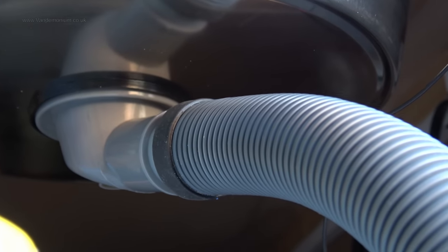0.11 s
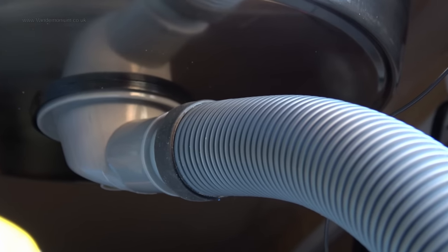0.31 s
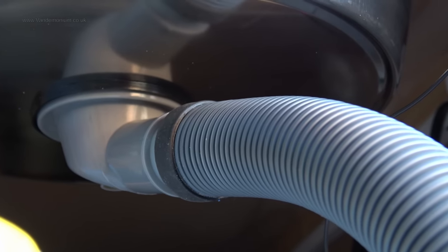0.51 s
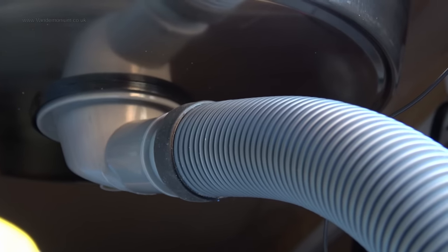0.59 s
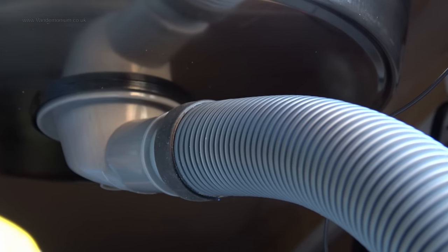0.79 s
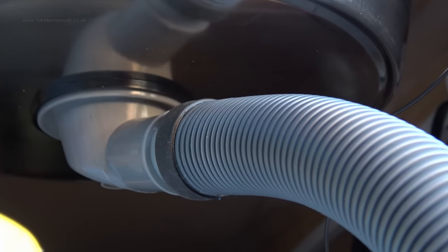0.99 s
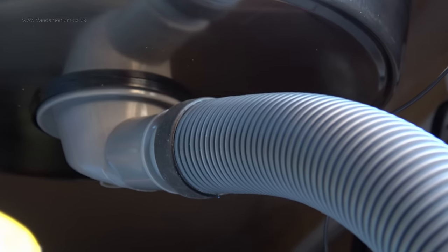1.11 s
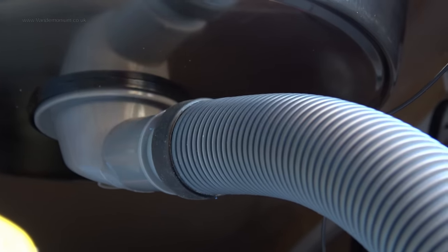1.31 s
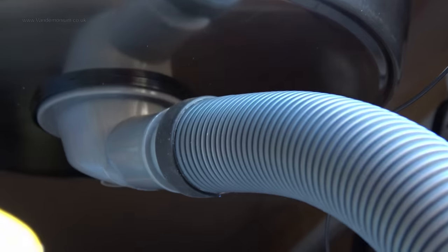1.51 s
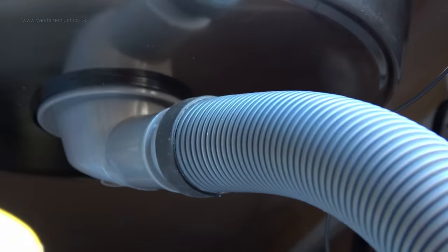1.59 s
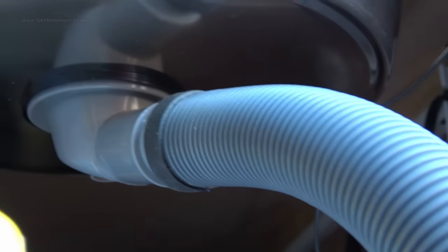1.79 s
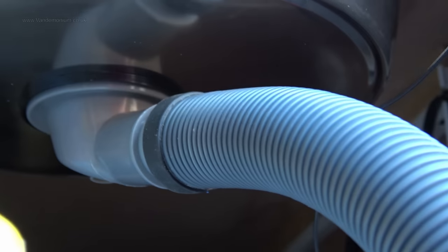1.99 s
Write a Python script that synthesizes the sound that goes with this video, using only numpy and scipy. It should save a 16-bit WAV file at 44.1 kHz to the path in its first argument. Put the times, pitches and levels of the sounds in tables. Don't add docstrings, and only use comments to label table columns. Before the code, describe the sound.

Gurgling drain water in a ribbed plastic hose, close up: hollow gulps and bubbles, an early hard wet slap, dense spitting and fizz, then sparser glugs over faint trickle and hiss in a small cupboard.

```python
import sys
import numpy as np
from scipy import signal
from scipy.fft import rfft, irfft
from scipy.io import wavfile
from scipy.ndimage import uniform_filter1d

SR = 44100
rng = np.random.default_rng(int(sys.argv[2]) if len(sys.argv) > 2 else 0)


def digitize_waveform(pressure):
    field = np.atleast_2d(pressure).T
    bounded = np.clip(field, -1, 1)
    quanta = np.round(bounded * 32767).astype(np.int16)
    wavfile.write(sys.argv[1], SR, quanta)


def volts_from_decibels(level):
    exponent = np.asarray(level, float) / 20
    return 10 ** exponent


N = 92610


def evened(x):
    return x / np.sqrt(np.mean(x ** 2) + 1e-20)


def read(points, hz):
    f, value = np.transpose(points)
    return np.interp(np.log(hz + 1), np.log(f + 1), value)


def add(mix, s, sound):
    part = mix[max(round(s * SR), 0):][:len(sound)]
    part += sound[:len(part)]


def coloured(x, spectrum):
    gain = volts_from_decibels(read(spectrum, np.fft.rfftfreq(len(x), 1 / SR)))
    return irfft(rfft(x) * gain, len(x))


def band(x, hz, width):
    b, a = signal.iirpeak(min(hz, SR / 3), 1 / max(width, 0.02), SR)
    return signal.lfilter(b, a, signal.lfilter(b, a, x))


def rings(modes, size=6000):
    t = np.arange(size) / SR
    h = sum(volts_from_decibels(db - 60 * t / t60) * np.sin(2 * np.pi * hz * t) for hz, db, t60 in modes)
    return h / np.linalg.norm(h)


def shape(length, rise, fall, size=9000):
    t = np.arange(size) / SR
    return (1 - np.exp(-t / rise)) * np.exp(-np.maximum(t - length, 0) / fall)


def pops(per_s, spread_db, size=9000):
    chance, sign = rng.random((2, size))
    loudness = volts_from_decibels(spread_db * np.minimum(rng.exponential(1, size), 4))
    return evened((chance < per_s / SR) * np.sign(sign - 0.5) * loudness)


def patchy(depth_db, size):
    a, b, drift = rng.standard_normal((N // 128 + 8, 257, 3)).T
    drift = evened(uniform_filter1d(uniform_filter1d(drift, size, 0), 10, 1))
    return signal.istft((a + 1j * b) * volts_from_decibels(depth_db * drift), nperseg=512, noverlap=384)[1][:N]


def hose(x):
    # f/Hz, level/dB, t60/s
    air_modes = [(143, 0, 0.25), (208.6, 6, 0.14), (331.5, -2.5, 0.14), (448, 6, 0.054), (538.6, 0.5, 0.1),
                 (647, 1.5, 0.1), (745, -2.5, 0.078), (800, -34, 0.11), (900, 0, 0.056), (1015, 2, 0.031),
                 (1290, -26, 0.041), (1514, 5, 0.035), (1700, 0.5, 0.039), (2130, -9, 0.074)]
    ring = signal.fftconvolve(x, rings(air_modes))[:len(x)]
    return ring * np.linalg.norm(x) / np.linalg.norm(ring)


def trickle():
    # f/Hz, level/dB
    murmur_colour = [(35, -45), (60, -27), (187, -5.5), (493, -6.5), (633, -1.5), (788, -13.5), (893, -0.5),
                     (1080, -16.5), (2500, -27.5), (3250, -48), (5500, -120)]
    # f/Hz, level/dB
    hiss_colour = [(710, -42), (1200, 0.5), (1990, -6), (2260, -3.5), (5010, -3), (6080, -7),
                   (15700, -10.5)]
    murmur = evened(coloured(patchy(1.5, size=4), murmur_colour))
    murmur = evened(murmur + 0.42 * hose(murmur))
    hiss = evened(coloured(patchy(0.6, size=20), hiss_colour))
    return volts_from_decibels(-57) * murmur + volts_from_decibels(-70) * hiss


def droplets():
    out, t = np.zeros(N), np.arange(600) / SR
    for hz in np.geomspace(500, 7000, num=16):
        blip = evened(np.sin(2 * np.pi * hz * t) * t * np.exp(-t * hz / 1.5))
        drops = pops(11.5, 3.0, size=N)
        out += signal.oaconvolve(drops, blip)[:N] * np.sqrt(1000 / hz)
    return volts_from_decibels(-71.5) * evened(out)


def spits():
    # t/s, peak level/dB, throat pitch f/Hz, length/s, fizz level/dB
    first_jets = [(0.001, -50, 5300, 0.014, -6), (0.112, -38, 2540, 0.014, -36),
                  (0.124, -52, 4200, 0.073, -14), (0.205, -35.5, 4630, 0.055, 19),
                  (0.321, -35.5, 5460, 0.011, 6), (0.425, -41, 3960, 0.023, -13),
                  (0.459, -40.5, 4260, 0.022, -8.5), (0.527, -41, 4030, 0.03, 1),
                  (0.556, -33, 4440, 0.027, -1.5), (0.58, -35, 4230, 0.012, -2.5),
                  (0.599, -40, 3900, 0.029, 0), (0.639, -39, 4660, 0.018, 8),
                  (0.671, -39, 3520, 0.034, -1.5), (0.705, -30.5, 5240, 0.032, 3),
                  (0.741, -52, 4700, 0.062, 22)]
    late_jets = [(0.926, -45.5, 6800, 0.014, -5), (0.962, -48, 7040, 0.01, 3),
                 (0.993, -38.5, 2710, 0.0064, -33), (1.136, -50.5, 6640, 0.0076, 6),
                 (1.354, -38, 4430, 0.0054, -8.5), (1.432, -51, 3970, 0.015, -30),
                 (1.517, -45.5, 4000, 0.021, 1.5), (1.561, -42, 3050, 0.0034, -24),
                 (1.575, -42.5, 2870, 0.019, -19), (1.665, -47.5, 8300, 0.024, 2),
                 (1.776, -44, 6760, 0.015, -32), (1.83, -46, 7760, 0.005, -3),
                 (1.862, -44, 7840, 0.0047, -4), (1.94, -53, 5040, 0.0043, -19),
                 (0.965, -51, 2680, 0.027, -28), (1.976, -51, 5500, 0.0077, -17),
                 (2.074, -57, 3140, 0.015, -21)]
    # f/Hz, level/dB
    fizz_colour = [(1530, -50), (2600, -4.5), (2950, 1.5), (4930, 3), (15700, -7.5)]
    # f/Hz, level/dB, t60/s
    trap_modes = [(2668, 4.5, 0.086), (3080, -0.5, 0.014), (3720, 4, 0.0041), (4630, 7, 0.096),
                  (5130, 8, 0.09)]
    out, trap = np.zeros(N), rings(trap_modes, size=2000)
    mist = evened(patchy(4, size=3))
    for s, db, hz, length, fizz_db in first_jets + late_jets:
        flicker = evened(uniform_filter1d(rng.standard_normal(9000), size=150))
        spray = volts_from_decibels(3.0 * flicker) * pops(4000, 1.17)
        mist_here = np.roll(mist, -round(s * SR))[:9000]
        fizz = evened(coloured(0.5 * evened(spray) + mist_here, fizz_colour))
        jet = evened(band(spray, hz, width=0.46)) + volts_from_decibels(fizz_db) * fizz
        jet = jet + volts_from_decibels(-17) * signal.fftconvolve(jet, trap)[:len(jet)]
        add(out, s, volts_from_decibels(db - 11) * shape(length, rise=0.0024, fall=0.0077) * evened(jet))
    return out


def steadied(x):
    return evened(x / np.sqrt(uniform_filter1d(x ** 2, size=300) + 0.05))


def gulps():
    # t/s, peak level/dB, bubble pitch f/Hz, length/s, size spread (0-1)
    first_gulps = [(0.029, -40, 900, 0.027, 0.56), (0.085, -31.5, 745, 0.025, 0.32),
                   (0.133, -37, 1815, 0.025, 0.45), (0.171, -36, 970, 0.031, 0.5),
                   (0.293, -31, 690, 0.12, 0.33), (0.36, -43, 298, 0.048, 0.07),
                   (0.423, -35.5, 710, 0.016, 0.2), (0.461, -19, 827, 0.015, 0.32),
                   (0.52, -46, 1015, 0.039, 0.11), (0.586, -36, 677, 0.035, 0),
                   (0.672, -39.5, 905, 0.017, 0.48), (0.717, -35, 597, 0.037, 0.25),
                   (0.766, -31.5, 886, 0.0079, 0), (0.801, -34.5, 870, 0.007, 0.3),
                   (0.872, -37.5, 1700, 0.031, 0.16), (0.899, -34, 900, 0.041, 0.35),
                   (0.99, -31.5, 900, 0.012, 0.15), (1.01, -61, 900, 0.0056, 0.2)]
    late_gulps = [(1.15, -45, 556, 0.063, 0.4), (1.297, -37.5, 900, 0.017, 0.32),
                  (1.344, -36, 987, 0.043, 0.16), (1.435, -41.5, 1760, 0.037, 0.19),
                  (1.448, -24, 900, 0.03, 0.23), (1.478, -29, 547, 0.046, 0.63),
                  (1.535, -33, 1340, 0.017, 0.4), (1.557, -36.5, 1105, 0.034, 0.54),
                  (1.602, -32.5, 715, 0.022, 0.36), (1.669, -34.5, 670, 0.028, 0.56),
                  (1.759, -35.5, 314, 0.017, 0.83), (1.786, -31.5, 713, 0.022, 0.22),
                  (1.893, -35, 696, 0.02, 0.52), (1.993, -53.5, 830, 0.024, 0.14),
                  (2.054, -47, 670, 0.047, 0.1)]
    out = np.zeros(N)
    for s, db, hz, length, spread in first_gulps + late_gulps:
        burst = pops(1100, 2.16) + 5 * (np.arange(9000) == 60)
        env = shape(length, rise=0.0016, fall=0.0045)
        bubbles = steadied(evened(band(burst, hz, spread)))
        wide = steadied(evened(band(burst, 0.39 * hz, 0.7)))
        thump = steadied(evened(band(burst, 362, 0.5)))
        drive = env * (bubbles + volts_from_decibels(-45) * wide + volts_from_decibels(-15.5) * thump)
        sound = drive + hose(drive)
        add(out, s, volts_from_decibels(db - 12) * sound * np.linalg.norm(env) / np.linalg.norm(sound))
    return out


def bursts():
    # t/s, peak level/dB, f/Hz
    big_bubbles = [(.030, -43, 970), (.0885, -33.5, 900), (.0955, -33.5, 710), (.1015, -37, 810),
                   (.108, -45, 680), (.135, -35.5, 1610), (.146, -48, 1700), (.173, -39, 840),
                   (.181, -41.5, 800), (.189, -40.5, 900), (.2305, -24, 658), (.2465, -19.5, 682),
                   (.255, -25.5, 423), (.275, -23.5, 647), (.286, -23.5, 710), (.324, -36, 740),
                   (.462, -31, 942), (.470, -29.5, 664), (.594, -39.5, 615), (.720, -42.5, 616),
                   (.735, -40.5, 724), (.773, -36.5, 826), (.803, -39.5, 840), (.876, -46, 1700),
                   (.884, -57, 1560), (.897, -56, 1580), (.917, -39, 890), (.926, -35, 820),
                   (.934, -35.5, 900), (.992, -39, 860), (1.001, -35, 920), (1.013, -37, 900),
                   (1.305, -50, 593), (1.327, -41.5, 900), (1.353, -47, 1060), (1.450, -41, 850),
                   (1.455, -38.5, 798), (1.461, -32, 867), (1.474, -31, 800), (1.487, -30, 735),
                   (1.500, -28.5, 610), (1.510, -39.5, 520), (1.537, -37, 1450), (1.546, -34, 1140),
                   (1.558, -32, 1030), (1.610, -39, 660), (1.696, -41, 685), (1.798, -33.5, 757),
                   (1.904, -41, 643), (1.993, -49, 900)]
    # t/s, peak level/dB, f/Hz
    snaps = [(0.1096, -56, 2500), (0.125, -46, 4630), (0.1877, -42, 4600), (0.2154, -41, 4970),
             (0.3245, -38.5, 4710), (0.4488, -40, 4900), (0.558, -40.5, 4030), (0.566, -44, 4400),
             (0.5836, -37, 3040), (0.587, -42, 4600), (.617, -49, 3500), (.6764, -37.5, 3230),
             (0.7101, -35, 3660), (0.7151, -37, 4750), (0.732, -48, 4460), (1.5567, -48, 3010),
             (1.5792, -44, 3160), (1.58, -48, 2290), (1.8636, -50, 8200), (1.944, -49.5, 4950),
             (1.958, -60, 5200), (.4334, -47, 2720), (.276, -35, 2630), (0.294, -38, 2690),
             (2.034, -59, 3770)]
    out, t = np.zeros(N), np.arange(1500) / SR
    for s, db, hz in big_bubbles:
        cycles = t * hz
        swell = cycles / 1.51
        env = (swell * np.exp(1 - swell)) ** 2
        rising_phase = cycles * (1 + 0.0074 * cycles)
        add(out, s, volts_from_decibels(db) * env * np.sin(2 * np.pi * rising_phase))
    out = signal.sosfilt(signal.butter(2, 330, "high", fs=SR, output="sos"), out)
    out = out + 0.37 * hose(out)
    for s, db, hz in snaps:
        cycles = t * hz
        grit = 1 + 0.5 * uniform_filter1d(rng.standard_normal(len(t)), size=4)
        env = np.minimum(cycles, 1) * np.exp(-cycles / 12.6)
        add(out, s, volts_from_decibels(db) * env * grit * np.sin(2 * np.pi * cycles))
    return out


def slap():
    # f/Hz, level/dB
    splash_colour = [(150, -33), (250, -13.5), (1110, -5), (1250, -13), (1900, -13.5), (2630, -18.5),
                     (2970, -18.5), (4580, -17), (15700, -38.5)]
    # f/Hz, t60/s
    splash_dies = [(300, 0.16), (700, 0.28), (1500, 0.3), (3000, 0.31), (6000, 0.14), (14000, 0.028)]
    # t/s, level/dB, f/Hz, t60/s
    cracks = [
        (0.232, -6, 3680, 0.021),
        (0.236, -11, 1260, 0.05),
        (0.244, -17.5, 2610, 0.051),
    ]
    # t/s, level/dB, f/Hz, length/s, fall/s
    surges = [
        (0.254, -33, 143, 0.038, 0.016),
        (0.262, -34, 209.5, 0.054, 0.0046),
    ]
    out, size = np.zeros(N), 12000
    spray = evened(coloured(pops(2500, 3.6, size=size), splash_colour))
    hz, t, z = signal.stft(spray, SR, nperseg=256)
    hold_s = 0.021
    z = z * volts_from_decibels(-60 * np.maximum(t - hold_s, 0) / read(splash_dies, hz)[:, None])
    splash = signal.istft(z, SR, nperseg=256)[1][:size] * shape(1, 0.00059, 1, size=size)
    add(out, 0.23, volts_from_decibels(-27) * (splash + 0.8 * hose(splash)))
    t = np.arange(size) / SR
    for s, db, hz, t60 in cracks:
        onset = 1 - np.exp(-t / 0.00012)
        add(out, s, volts_from_decibels(db - 11 - 60 * t / t60) * onset * np.sin(2 * np.pi * hz * t))
    for s, db, hz, length, fall in surges:
        add(out, s, volts_from_decibels(db) * shape(length, 0.014, fall, size=size) * np.sin(2 * np.pi * hz * t))
    return out


def cupboard(x):
    t = np.arange(4000) / SR
    t60_s, gap_s = 0.16, 0.002
    tail = pops(2800, 0.0, size=4000) * volts_from_decibels(-60 * t / t60_s) * (t > gap_s)
    return x + volts_from_decibels(-11.5) * signal.fftconvolve(x, tail / np.linalg.norm(tail))[:N]


def scene():
    water = gulps() + slap() + spits() + droplets() + bursts()
    return (cupboard(water) + trickle())[None]


def low_pass(x):
    return signal.sosfilt(signal.butter(12, 15820, fs=SR, output="sos"), x)


def record(dry):
    low_cut = signal.butter(3, 110, "high", fs=SR, output="sos")
    edge = signal.firwin(401, 15850, window=("kaiser", 9), fs=SR)[None]
    mix = signal.oaconvolve(signal.sosfilt(low_cut, dry), edge, "same")
    return low_pass(mix)


dry = scene()
out = record(dry)
digitize_waveform(out)
```